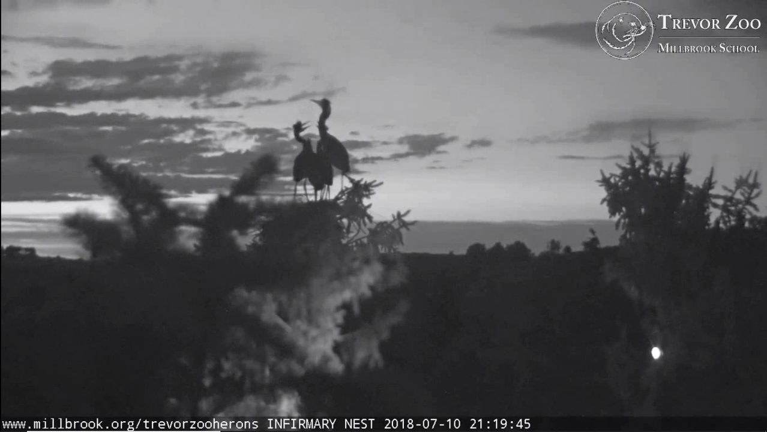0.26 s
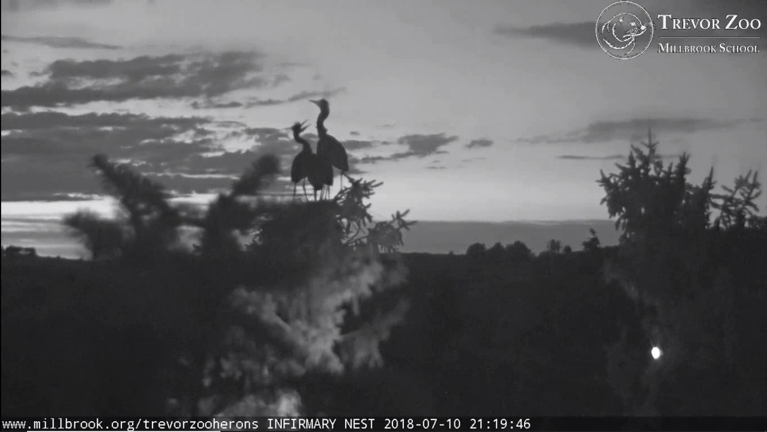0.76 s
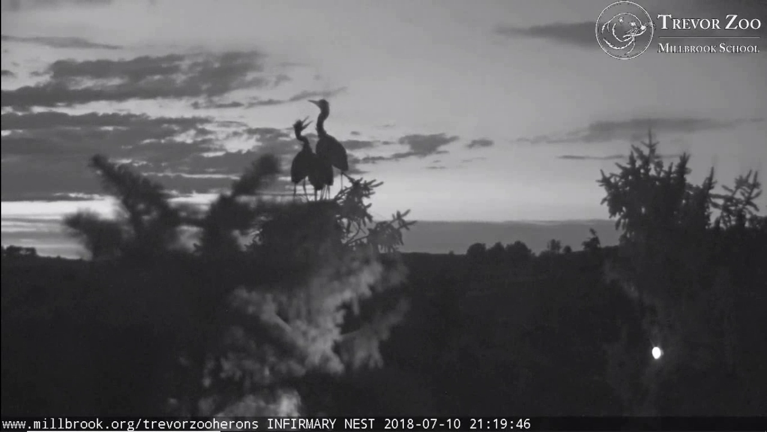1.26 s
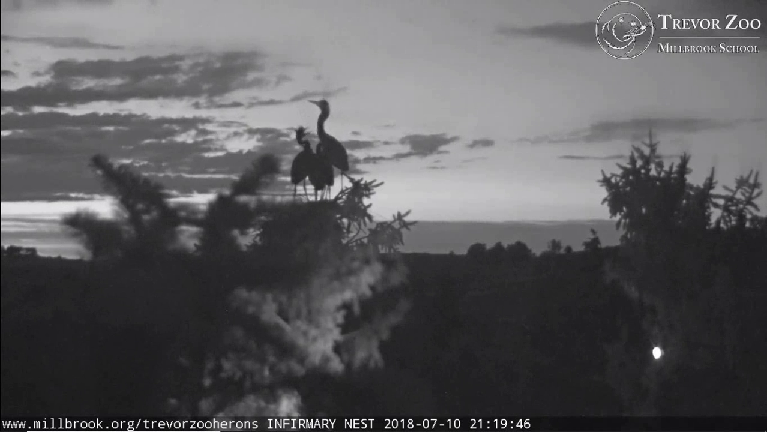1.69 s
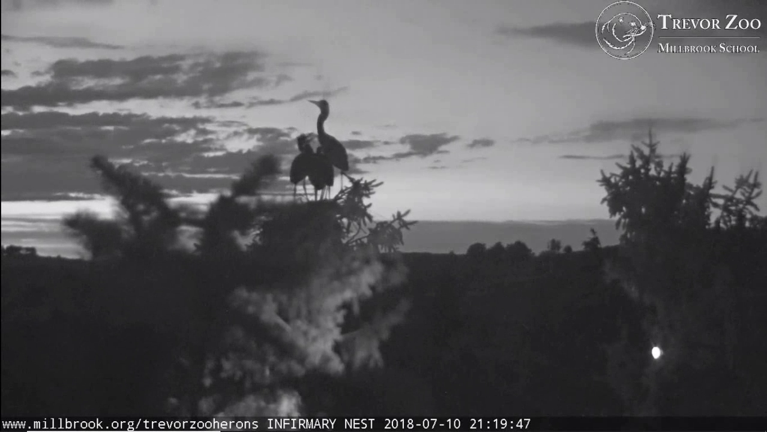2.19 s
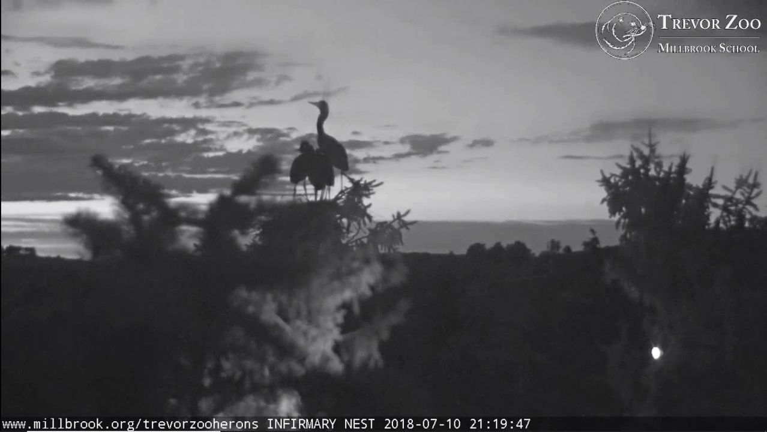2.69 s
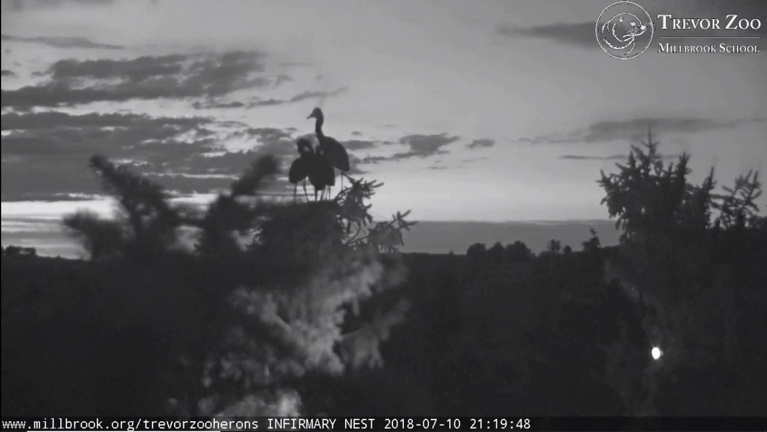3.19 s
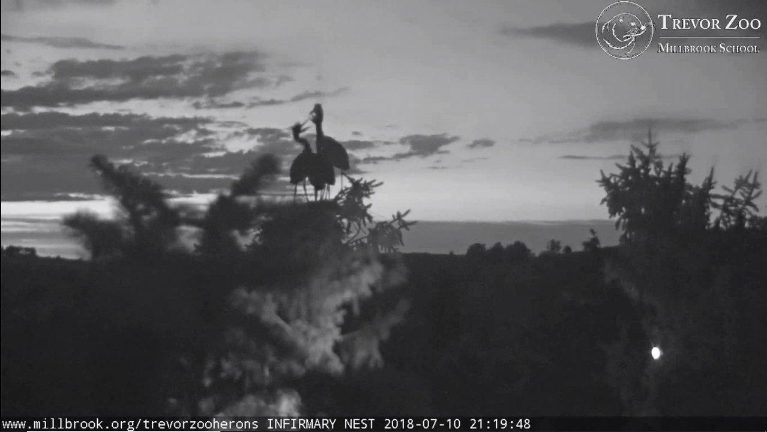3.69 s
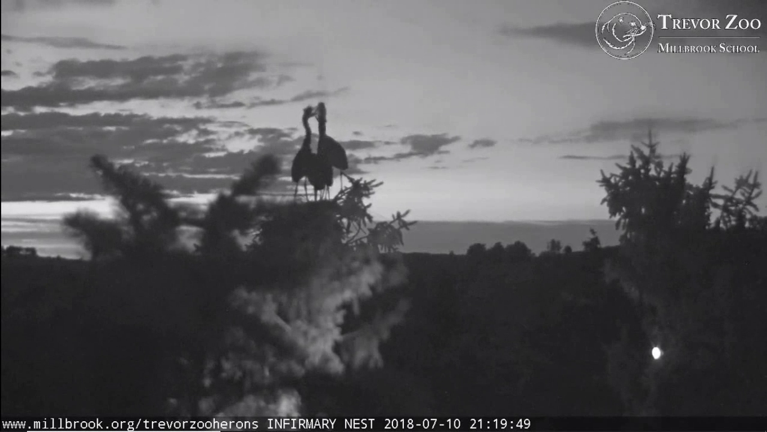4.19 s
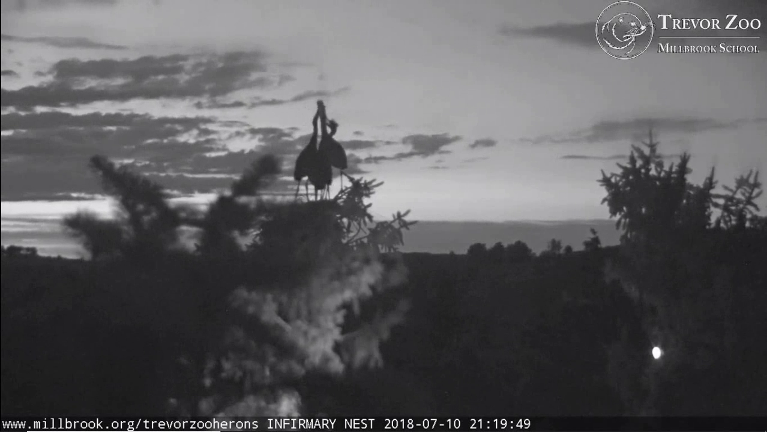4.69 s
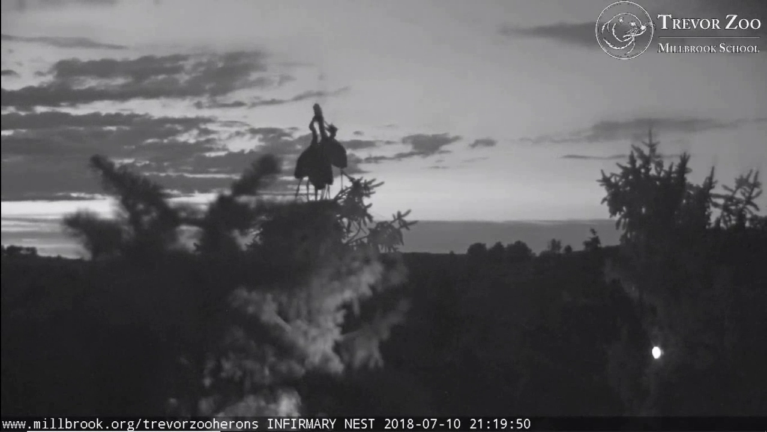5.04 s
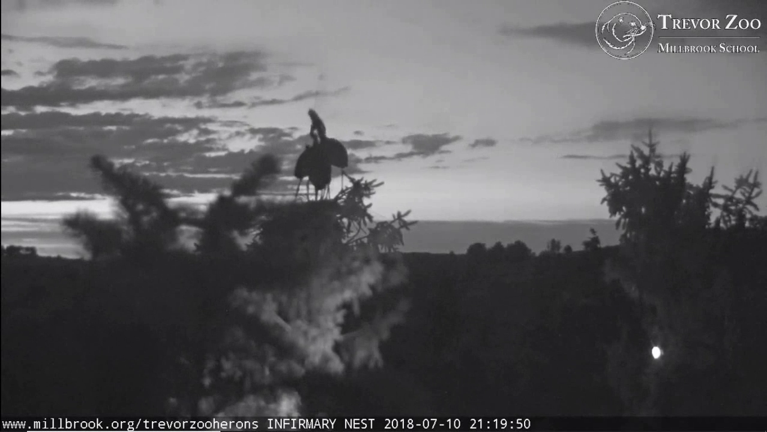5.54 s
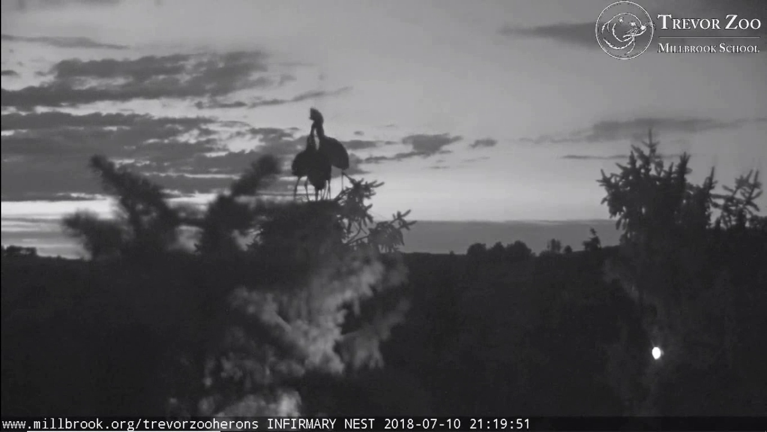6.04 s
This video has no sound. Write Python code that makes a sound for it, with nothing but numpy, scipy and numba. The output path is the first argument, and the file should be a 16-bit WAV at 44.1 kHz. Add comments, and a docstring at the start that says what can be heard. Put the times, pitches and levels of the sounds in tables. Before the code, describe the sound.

Young herons give rapid, sharp, clacking begging calls outdoors, over a faint night hiss and low hum.

```python
"""Heron chicks beg on a treetop nest at dusk, heard by an outdoor camera's small microphone.
From the start, "kak" calls sound over the night's hiss and a low hum. Each begins as a burst of
syrinx pulses ringing the throat and bill, dies away in a duller rasp, and echoes faintly off the trees.
The calls weaken around 3 s, build again, and end loudest, about six to the second."""
import sys
import numpy as np
from scipy import signal
from scipy.fft import rfft, irfft
from scipy.io import wavfile
from scipy.ndimage import uniform_filter1d
from numba import njit

SR = 44100
rng = np.random.default_rng(int(sys.argv[2]) if len(sys.argv) > 2 else 0)


def to_wav(sig):
    """Store sig (one row per channel, or 1-D mono) as 16-bit WAV at the path in sys.argv[1].

    Samples outside -1..1 are clipped; the rate is SR.
    """
    pcm = np.clip(np.atleast_2d(sig), -1, 1) * 32767
    pcm = np.round(pcm).astype(np.int16)
    wavfile.write(sys.argv[1], SR, pcm.T)  # frames by channels


N = 278712

# Calls: onset t/s, throat peak level/dB, throat f/Hz, low-edge gain/dB, bill level/dB re throat,
# first pulse level/dB re full effort, rise t/s, fall t/s, rasp level/dB re full effort, rasp t/s,
# pulse rate f/Hz
CALLS = [(0.0, -37, 2040, 4, -7, 1.5, 0.0033, 0.037, -14.5, .036, 157),
         (.119, -25, 2000, -21, -1.5, -8, 0.022, 0.029, -10.5, 0.12, 219),
         (.315, -27, 1950, 4, -3, -23.5, 0.033, 0.011, -8.5, .085, 204),
         (.505, -25.5, 1952, -1, -3, -19, .021, 0.021, -10, .095, 248),
         (0.6841, -24.5, 2060, 7, -2.5, -11.5, 0.041, 0.014, -8.5, 0.032, 161),
         (0.813, -44, 2270, -9, -7, 0.5, 0, .021, -16, .01, 220),
         (0.856, -32.5, 1667, -22, -7.5, -16, 0.016, 0.027, -14, .007, 180),
         (1.032, -30.5, 1874, -27, -5.5, -12.5, 0.019, 0.028, -9.5, .045, 153),
         (1.154, -33.5, 1893, -6, -3.5, -20, 0.013, .018, -1.5, .002, 210),
         (1.205, -28, 1917, -4, -6.5, -8.5, 0.034, 0.028, -14, .06, 173),
         (1.3453, -28.5, 1898, -25, -3.5, -13, .016, 0.018, -8, .085, 200),
         (1.535, -29.5, 1984, -4.5, -1.5, -20, 0.016, 0.015, -6.5, 0.11, 214),
         (1.717, -31.5, 2070, 15, -4, -14, 0.015, .006, -3.5, .021, 240),
         (1.75, -31, 1963, -8, -7, -12, 0.017, 0.016, -7, 0.071, 178),
         (1.921, -31, 1898, -32, -10, -18, 0.035, 0.017, -10.5, .009, 194),
         (1.989, -44.5, 1860, -11, -12, -20, 0.012, 0.017, -15, .003, 135),
         (2.084, -36.5, 1660, -3, -10, -6.5, 0.034, 0.0042, -1.5, .002, 246),
         (2.117, -31, 1908, -17, -11.5, -9, 0.0093, 0.017, -9, .05, 214),
         (2.2843, -30.5, 1860, -11, -11, -12, 0.019, 0.054, -16, .046, 177),
         (2.405, -46.5, 1816, -4, -7, 12, 0.0017, .022, -22, .003, 200),
         (2.452, -43.5, 1650, 27, -3, -15, 0.011, 0.035, -14, .011, 190),
         (2.773, -40.5, 1800, 19, -4.5, -3, 0.0094, 0.016, -2, .004, 193),
         (2.831, -45, 1600, 25, -3.5, -7, 0, 0.018, -6.5, .053, 200),
         (2.9264, -34.5, 1677, 1.5, -8, -4, 0.013, 0.016, -17, .002, 212),
         (2.9823, -39.5, 1646, 30, -2, -13, .016, 0.028, -16, .036, 240),
         (3.099, -39, 1660, 17, -6.5, -9, 0.014, 0.019, -9, 0.012, 184),
         (3.153, -40, 2000, 32, -6, -3, 0.0086, 0.014, -10.5, .055, 275),
         (3.2696, -34, 2190, 20, -12.5, -9, 0.011, .022, -10, .015, 214),
         (3.323, -38.5, 1600, 23, 5, -5.5, 0.013, 0.023, -5.5, .006, 164),
         (3.4772, -34.5, 1805, 18, -9.5, 0, .024, .004, -6, .002, 210),
         (3.508, -28, 2040, 22, 0.3, -12.5, 0.016, .016, -11, 0.051, 198),
         (3.635, -33, 1840, -7, -10, -4, 0.022, 0.013, -11.5, .009, 183),
         (3.692, -30, 1990, 22, -2.5, -9.5, .022, 0.029, -12, .045, 214),
         (3.7955, -30, 1866, -14.5, -11, -11, 0.016, 0.024, -10.5, .048, 187),
         (3.967, -28.5, 1610, -13, -11, -9, 0.027, 0.035, -16, .05, 188),
         (4.095, -52, 1623, -9, -2.5, -10, 0.0013, 0.014, -13, .002, 145),
         (4.1324, -28, 1874, -18, -12.5, -9, 0.016, .03, -2, .008, 210),
         (4.19, -32.5, 1835, 1, -0.5, -6.5, .009, 0.0083, -6.5, 0.14, 234),
         (4.373, -28.5, 1930, -6, -1.5, -19, 0.017, 0.015, -6.5, .052, 182),
         (4.453, -33, 1795, -7, -8.5, -15.5, 0.021, 0.02, -10, .004, 165),
         (4.561, -29.5, 2130, 6, -3.5, -15, 0.02, 0.029, -12.5, .006, 221),
         (4.621, -31.5, 1674, 5, -7, -3.5, 0.027, 0.019, -12, .04, 230),
         (4.741, -30, 1643, -8, 2, -19, 0.02, 0.029, -14.5, .002, 188),
         (4.8, -29.5, 1876, -12, -6, -3.5, .021, 0.023, -9, .046, 196),
         (4.9247, -31.5, 1770, -3, 0, -25, 0.018, 0.018, -4.5, .006, 220),
         (4.974, -28, 1920, .1, -5, -7, 0.03, 0.019, -13, .066, 192),
         (5.091, -49.5, 2100, 1, -6.5, -2, 0.044, .005, -3, .002, 210),
         (5.123, -27, 1970, .1, 0.5, -8.5, 0.013, 0.014, -8, .096, 187),
         (5.304, -26.5, 1940, -4, 3.5, -17.5, 0.023, 0.02, -9, 0.022, 227),
         (5.364, -31, 1910, -3, -5.5, 1.5, 0.026, 0.02, -10.5, .019, 190),
         (5.492, -25, 2094, 9.5, 0.7, -14.5, 0.031, 0.015, -10.5, 0.079, 223),
         (5.687, -21.5, 2050, 14, -2, -21.5, 0.021, 0.024, -13, 0.068, 200),
         (5.857, -23, 2045, -9, -3.5, -23.5, 0.031, 0.017, -8, .084, 237),
         (6.025, -23.5, 2070, -17, -14, -13.5, 0.023, 0.026, -14, .07, 210),
         (6.1939, -23.5, 2120, -10, -15.5, -17, 0.026, 0.017, -6.5, 0.051, 204)]
def chicks():
    """Superposition of the calls; air absorption over the distance takes the top off."""
    size = SR // 5
    calls = np.zeros(N + size)
    for onset, *settings in CALLS:
        start = int(onset * SR)
        calls[start:start + size] += kak(np.arange(size) / SR, *settings)
    return signal.sosfilt(signal.butter(3, 8000, fs=SR, output="sos"), calls[:N])


def kak(t, level_db, throat_hz, edge_db, bill_db, first_db, rise_s, fall_s, rasp_db, rasp_s, pulse_hz):
    """Source-filter principle: one burst from the syrinx drives throat, bill and chest in parallel."""
    hold_s, rasp_fade_db_per_s = 0.0028, 243.5
    corners = np.cumsum(np.maximum([0, rise_s, hold_s, fall_s, rasp_s], 1e-4))
    _, rise_end, hold_end, _, call_end = corners
    efforts_db = [first_db, 0, 0, rasp_db, rasp_db - rasp_fade_db_per_s * rasp_s]
    pulses = syrinx(t, corners, efforts_db, pulse_hz)
    source = add_breath(pulses, t - hold_end - fall_s / 2)
    closing_s = np.maximum(t - rise_end, 0)
    sag = 2.5 * np.maximum(t - call_end + .04, 0) * (rasp_s > .04)  # long rasps droop at their end
    voice = throat(t, source, throat_hz, closing_s, sag, edge_db, bill_db)
    voice += bill(source, np.interp(t, corners, efforts_db), bill_db)
    return undb(level_db) * voice + chest(pulses, level_db)


def syrinx(t, corners, efforts_db, pulse_hz):
    """Self-sustained oscillation: pulses quicken to a settled rate and grow irregular as the call ages."""
    step = np.arange(50)
    period_noise, size_noise = rng.standard_normal((len(step), 2)).T
    jitter = np.clip((.04 + .008 * step) * period_noise, -.5, .5)
    periods = (1 + 0.2511 * np.exp(-step / 1.5) + jitter) / pulse_hz
    times = np.cumsum(periods) - periods[0]
    shimmer_db = 1.9 * size_noise + 1.5 * (-1) ** step  # strong and weak pulses alternate
    sizes_db = np.interp(times, corners, efforts_db) + shimmer_db
    sounding = times <= min(corners[-1], t[-1])
    pulses = np.zeros(len(t))
    pulses[(times[sounding] * SR).astype(int)] = undb(sizes_db[sounding])
    return pulses


def add_breath(pulses, since_mid_fall_s):
    """Turbulence: a puff of air follows each pulse, and its share grows as the call falls."""
    puff_envelope = signal.lfilter([1], [1, -np.exp(-1 / (0.0057 * SR))], pulses)
    puffs = .3 * puff_envelope * rng.standard_normal(len(pulses))
    air_share = np.clip(.11 + 4.83 * np.maximum(since_mid_fall_s, 0), 0, .8)
    return (1 - air_share) * pulses + air_share * puffs


# Steady throat modes, beside the moving one and at its low edge: f/Hz, width/Hz, relative level/dB
SIDE_MODES = [(1530, 220, -7), (1720, 200, -5), (2090, 160, -4), (2330, 250, -12)]
EDGE_MODE = [(1416, 200, -30)]
def throat(t, source, throat_hz, closing_s, sag, edge_db, bill_db):
    """Cavity resonance: it rises as the bill opens, then sinks, narrows and loses its side modes."""
    opening = 0.057 * np.exp(-t / 0.012)
    glide = np.clip(1 - opening - .6 * closing_s - sag, .5, 1.2)
    narrowing = np.exp(-6 * closing_s)
    main = ring(source / np.sqrt(narrowing), [(throat_hz, 260, 0)], glide, narrowing)
    sides_db = 4.5 + 0.42 * bill_db  # stronger with a wide-open, loud bill
    sides = undb(sides_db) * ring(source * undb(-45 * closing_s), SIDE_MODES)
    edge = undb(edge_db) * ring(source, EDGE_MODE)
    low_cut = signal.butter(4, 1157, "high", fs=SR, output="sos")
    return at_peak(signal.sosfilt(low_cut, main + sides + edge), 0)


# Bill modes, then the high ones that give the bite: f/centre_hz, width/Hz, relative level/dB
BILL_MODES = [(0.793, 396, -3.5), (0.914, 360, 4.5), (1.071, 500, 4), (1.244, 640, -10)]
BITE_MODES = [(1.4, 400, -8.5), (1.532, 358, -21.5), (1.8, 968, -38), (2.32, 786, -43)]
def bill(source, effort_db, bill_db, centre_hz=3172):
    """Modal excitation: harder pulses drive the bill's high modes more, so they sound brighter."""
    body = ring(source * undb(0.33 * effort_db), BILL_MODES, centre_hz)
    bite = ring(source * undb(0.45 * effort_db), BITE_MODES, centre_hz)
    bite_db = -6 - 0.29 * bill_db  # the bite weakens less than the bill
    return at_peak(body + undb(bite_db) * bite, bill_db)


# Chest modes: f/Hz, width/Hz, relative level/dB
CHEST_MODES = [(248, 130, -3.5), (435, 110, -7), (680, 292, -4.5), (940, 77, -29)]
def chest(pulses, call_db):
    """Forced vibration: the chest follows the pulses alone and grows little with the call."""
    return at_peak(ring(pulses, CHEST_MODES), -48 + 0.33 * call_db)


def ring(x, modes, hz_scale=0.98, width_scale=1.):
    """Modal superposition: resonances of alternating sign, each applied twice for steep skirts."""
    total, ones = 0, np.ones(len(x))
    for k, (hz, width, db) in enumerate(modes):
        centre, bandwidth = hz * hz_scale * ones, width * width_scale * ones
        once = resonator(x, centre, bandwidth)
        total = total + (-1) ** k * undb(db) * resonator(once, centre, bandwidth)
    return total


@njit
def resonator(x, hz, width):
    """Damped oscillator: a state-variable band-pass with moving centre and width, gain 1 at the centre."""
    y, band_state, low_state = np.empty(len(x)), 0., 0.
    for i in range(len(x)):
        g, damping = np.tan(np.pi * hz[i] / SR), width[i] / hz[i]
        band = (band_state + g * (x[i] - low_state)) / (1 + g * (g + damping))
        band_state = 2 * band - band_state
        low_state += 2 * g * band
        y[i] = damping * band
    return y


def tree_echoes(x, level_db=-17, t60_s=0.078):
    """Scattering: branches and trunks return a short, dense tail that decays exponentially."""
    t = np.arange(SR // 3) / SR
    response = rng.standard_normal(len(t)) * undb(-60 * t / t60_s) * (t > .006)
    return undb(level_db) * signal.fftconvolve(x, response / np.linalg.norm(response))[:N]


# Spectrum of the night air: f/Hz, relative spectral density level/dB
NIGHT_SPECTRUM = [(41, -49), (90, -38.5), (122, -16.5), (190, -7.5), (315, -9), (578, -20), (800, -24.5),
                  (1080, -27.5), (1600, -15), (2060, -6.5), (2600, -19.5), (3500, -16), (4690, -29),
                  (6550, -37.5), (11000, -40.5), (15000, -47.5)]
def night_hiss(rms_db=-67.5):
    """Incoherent sources: far rustle and insects merge into noise whose low bands flicker most."""
    hz = np.maximum(np.arange(N // 2 + 1) * SR / N, 1)
    knots_hz, knots_db = np.array(NIGHT_SPECTRUM).T
    colour = undb(np.interp(np.log(hz), np.log(knots_hz), knots_db, left=-90, right=-90))
    spectrum = rfft(rng.standard_normal(N)) * colour
    edges_hz = 30 * 2 ** np.arange(0, 9.6, .5)  # half octaves
    hiss = np.zeros(N)
    for low, high in zip(edges_hz, edges_hz[1:]):
        band = irfft(spectrum * ((hz >= low) & (hz < high)), N)
        flicker_db = np.clip(900 / low, .4, 1.6) * wander(14)
        hiss += undb(flicker_db) * band
    return hiss * undb(rms_db) / hiss.std()


# Partials of the low hum: f/Hz, rms level/dB
HUM_PARTIALS = [(104.2, -90), (208.4, -82)]
def hum():
    """Frequency modulation: a low tone and its octave waver slightly together."""
    phase_per_hz = 2 * np.pi * np.cumsum(1 + 0.0031 * wander(9.6)) / SR
    return sum(np.sqrt(2) * undb(db) * np.sin(hz * phase_per_hz) for hz, db in HUM_PARTIALS)


def wander(rate_hz):
    """Low-pass noise: random values, each held for 1 / rate_hz seconds, smoothed twice."""
    hold = int(SR / rate_hz)
    steps = np.repeat(rng.standard_normal(N // hold + 1), hold)
    return 1.7 * uniform_filter1d(uniform_filter1d(steps, hold), hold)[:N]


def undb(db):
    """Decibel law: level to amplitude ratio."""
    return 10 ** (np.asarray(db) / 20)


def at_peak(x, db):
    """Normalisation to a given peak level."""
    return undb(db) * x / np.abs(x).max()


def scene():
    """Superposition: direct calls, their echoes and the background add in one channel."""
    calls = chicks()
    return (calls + tree_echoes(calls) + night_hiss() + hum())[None]


def record(dry):
    """Band limiting: the camera cuts off steeply above 15 kHz."""
    return signal.sosfilt(signal.ellip(8, .2, 40, 15000, fs=SR, output="sos"), dry)


dry = scene()
out = record(dry)
to_wav(out)
```